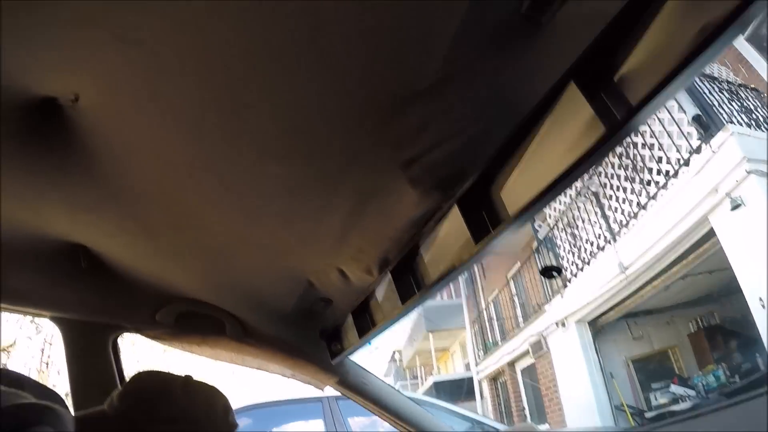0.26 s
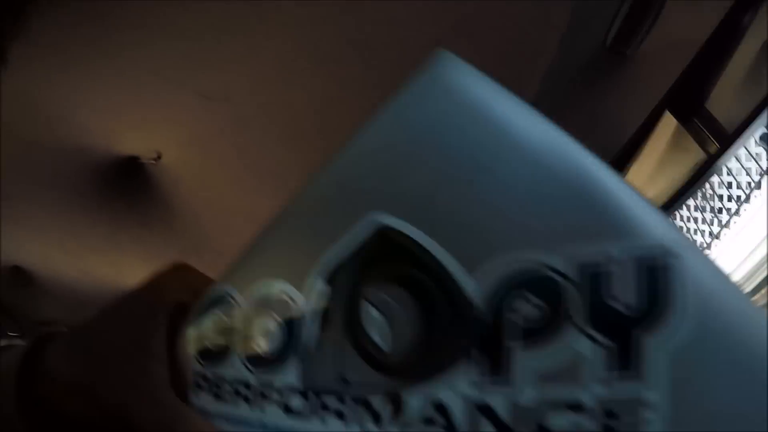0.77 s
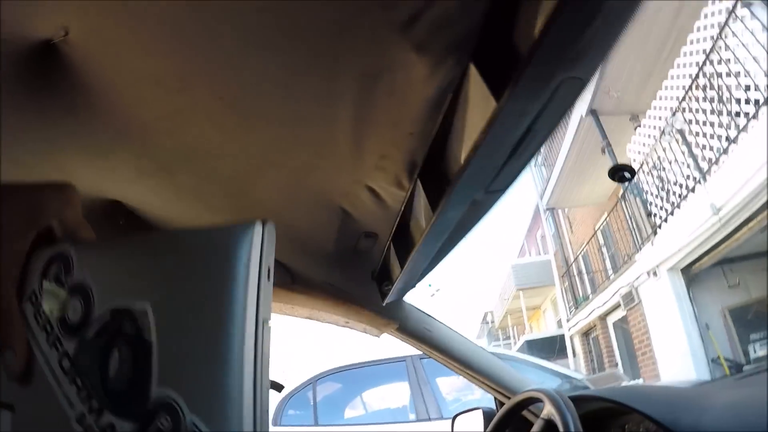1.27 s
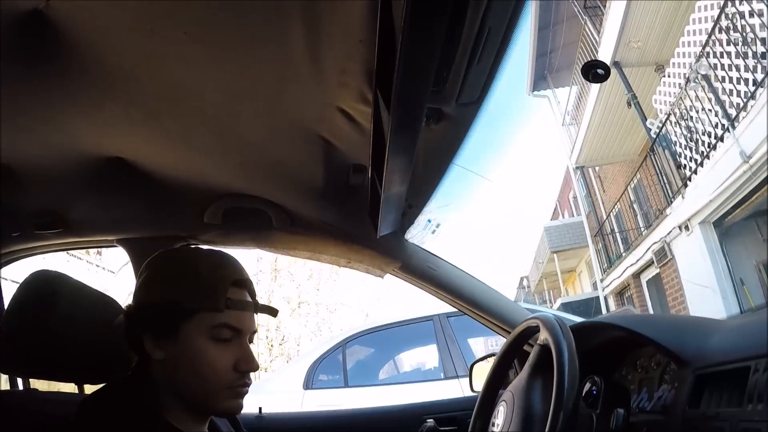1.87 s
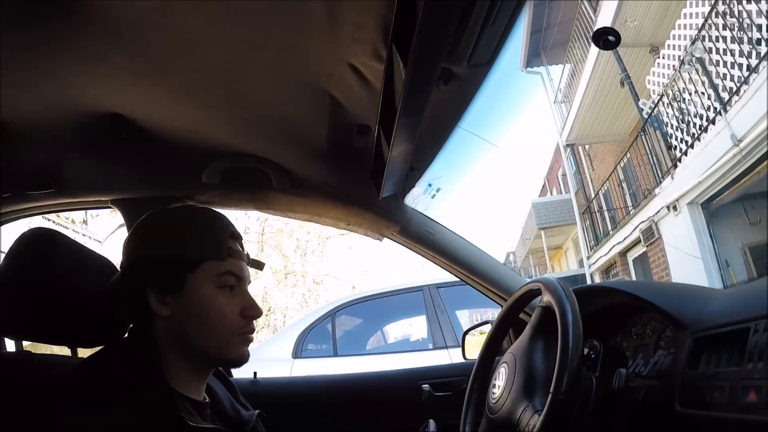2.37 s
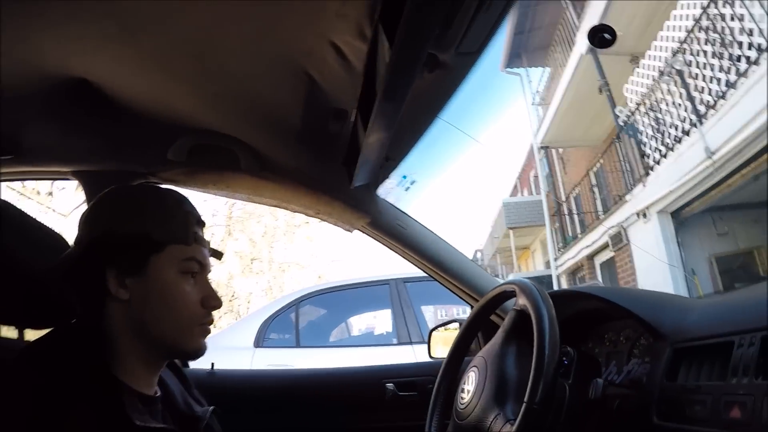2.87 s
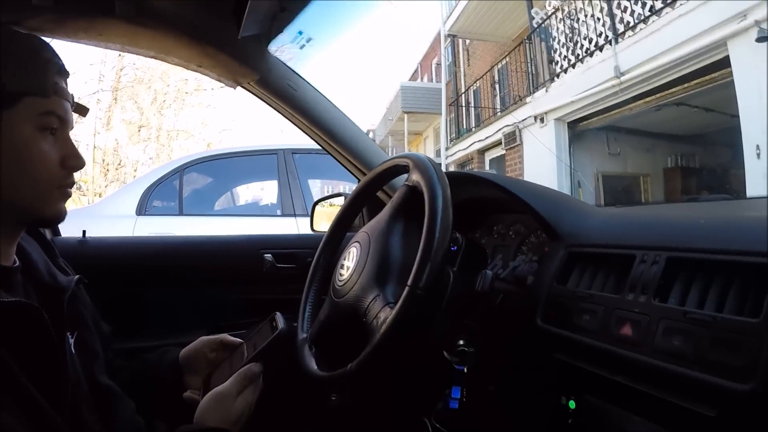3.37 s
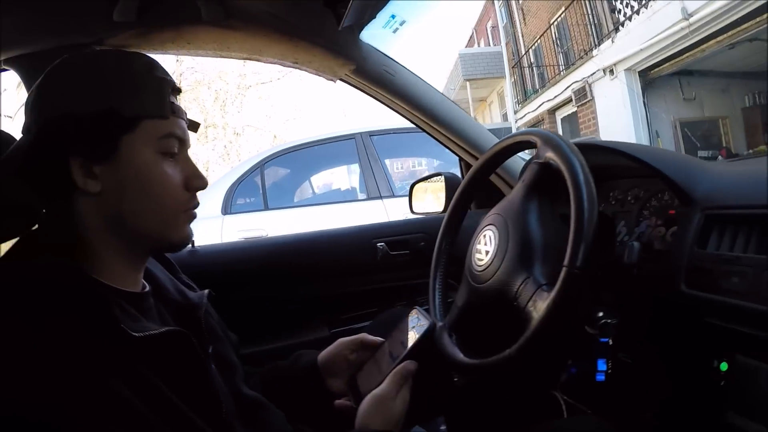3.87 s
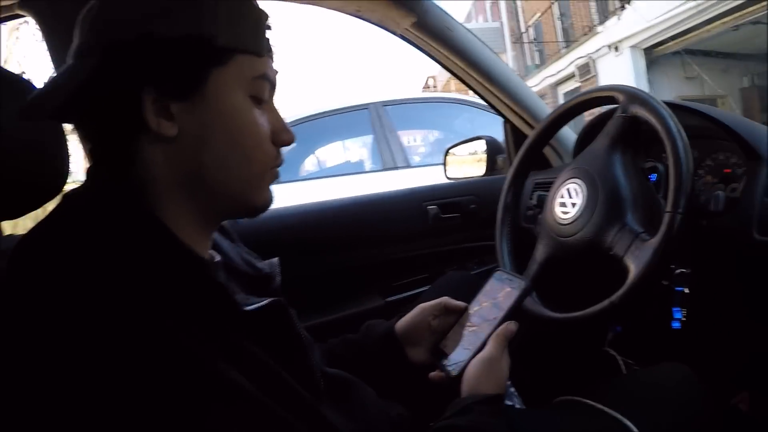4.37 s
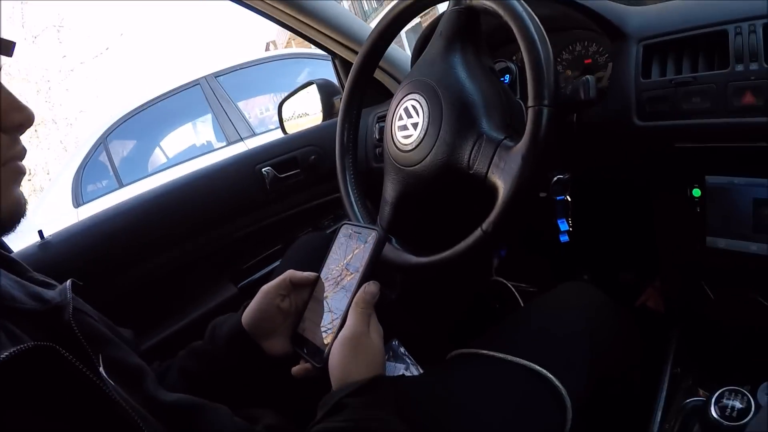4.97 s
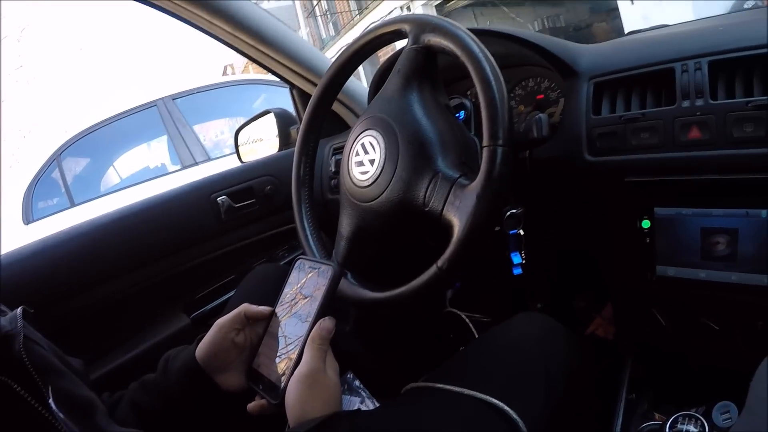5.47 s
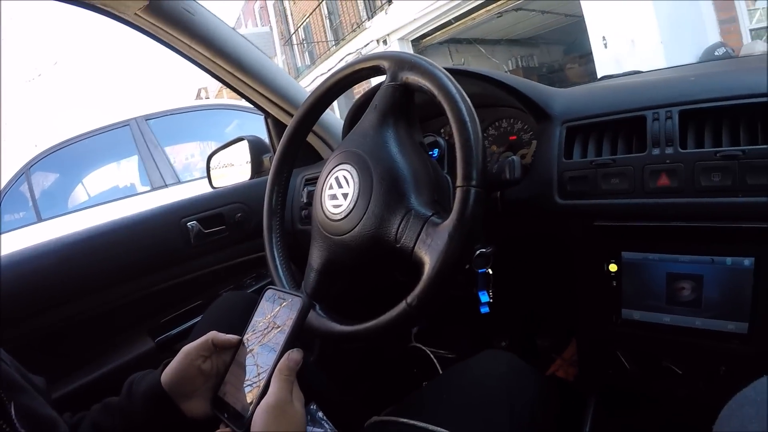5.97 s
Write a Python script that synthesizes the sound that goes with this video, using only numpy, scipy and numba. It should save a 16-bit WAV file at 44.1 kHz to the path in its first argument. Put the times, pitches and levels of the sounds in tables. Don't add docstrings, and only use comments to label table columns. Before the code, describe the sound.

Inside a parked car, a four-cylinder turbo engine idles with a deep, uneven throb. The hand-held microphone is knocked: ticks, rubbing, then a heavy clunk at half a second that briefly ducks the sound, more thumps later. A gentle press lifts the engine speed, then full throttle swells into a loud boom with hiss, and it begins to drop.

```python
import sys
import numpy as np
from scipy import signal
from scipy.fft import rfft, irfft, next_fast_len
from scipy.io import wavfile
from scipy.ndimage import uniform_filter1d
from numba import njit

SR = 44100
rng = np.random.default_rng(int(sys.argv[2]) if len(sys.argv) > 2 else 0)


def dump_mix(stems):
    frames = np.atleast_2d(stems).T
    limited = np.clip(frames, -1, 1)
    pcm = np.round(limited * 32767).astype(np.int16)
    wavfile.write(sys.argv[1], SR, pcm)


def attenuation_scalar(level_db):
    decades = np.asarray(level_db, float) / 20
    return 10 ** decades


N = 273640
T = np.arange(N) / SR
IDLE_HZ = 25.7

# time in seconds, firing rate in Hz, pulse sharpness from 0 to 1,
# exhaust pulse level in dB.
ENGINE_STATE = [(0.0, 24.74, 0.21, -22.4), (0.45, 25.12, 0.06, -21.5), (1.2, 25.78, 0.02, -17),
                (2.14, 24.93, 0.29, -24.5), (3.09, 25.45, 0.11, -17), (3.33, 28.6, 0, -15.5),
                (3.64, 39.23, 0.86, -24), (3.85, 44.33, 0.51, -14), (4.23, 47.97, 0.82, -26),
                (4.58, 50.65, 0.5, -12), (4.82, 56.76, 0.42, -0.3), (5.0, 70.23, 0.68, -12.5),
                (5.28, 99.97, 0.57, -2), (5.4, 111.6, 0.43, 3), (5.51, 116.1, 0.25, -5.5),
                (5.62, 112.3, 0.03, 1), (5.94, 98.9, 0.25, -4), (6.2, 88.04, 0.41, -3.5)]
# centre in Hz, width in Hz, level in dB.
CREAK_MODES = [(1920, 43, -1.5), (3840, 250, 1), (5760, 380, -5.5)]


def curve(table):
    s, *columns = np.transpose(table)
    return [np.interp(T, s, c) for c in columns]


def shape_db(points, hz):
    f, db = np.transpose(points)
    return np.interp(np.log(hz + 1e-9), np.log(f), db)


def swell(s, rise, hold, fall):
    return np.interp(T, s + np.cumsum(np.abs([0, rise, hold, fall])), [0, 1, 1, 0])


def walk(rate):
    k = int(SR / rate)
    steps = np.repeat(rng.standard_normal(N // k + 1), k)
    return 1.3 * uniform_filter1d(uniform_filter1d(steps, k), k)[:N]


def noise(points, flicker_db, rate, modes=()):
    size = next_fast_len(N)
    hz = np.fft.rfftfreq(size, 1 / SR)
    inside = (hz >= points[0][0]) & (hz <= points[-1][0])
    spectrum = rfft(rng.standard_normal(size)) * attenuation_scalar(shape_db(points, hz)) * inside
    for centre, width, db in modes:
        spectrum *= 1 + (attenuation_scalar(db) - 1) / (1 + (2 * (hz - centre) / width) ** 2)
    octave = np.log2(hz / points[0][0] + 1e-9)
    out = 0
    for k in range(int(octave[inside].max()) + 2):
        share = np.sqrt(np.clip(1 - abs(octave - k), 0, 1))
        out = out + irfft(spectrum * share, size)[:N] * attenuation_scalar(flicker_db * walk(rate))
    return out / np.std(out)


@njit
def svf(x, hz, width):
    y, b, l = np.empty(len(x)), 0., 0.
    for i in range(len(x)):
        g, k = np.tan(np.pi * hz[i] / SR), width / hz[i]
        v = (b + g * (x[i] - l)) / (1 + g * (g + k))
        b, l, y[i] = 2 * v - b, l + 2 * g * v, k * v
    return y


def band(x, hz, width):
    centre = np.full(len(x), 1. * hz)
    y = svf(svf(x, centre, 1. * width), centre, 1. * width)
    return y / abs(y).max()


def add(out, s, x):
    i = int(s * SR)
    out[i:i + len(x)] += x[:N - i]


def engine():
    # start, press, hold and release in seconds, throttle from 0 to 1.
    pedal = [
        (3.14, 0.22, 0.33, 0.16, 0.28),
        (4.69, 0.34, 0.39, 0.086, 1),
    ]
    # idle level in dB, dB per octave of speed,
    # dB added at full throttle.
    bay_law = [(-40, 6, 2.5), (-49.5, 6.5, 4.5), (-62, 5, 5.5), (-27.5, 2.5, 15.5)]
    hz = curve(ENGINE_STATE)[0]
    throttle = sum(depth * swell(*foot) for *foot, depth in pedal)
    octaves = np.log2(hz / IDLE_HZ)
    growl_db, clatter_db, air_db, upper_db = (
        idle + rev * octaves + push * throttle for idle, rev, push in bay_law)
    phase = 2 * np.pi * np.cumsum(hz) / SR + 3.45
    smooth_db = 4.8 * np.log2(hz / hz.min())
    out = firing_orders(phase)
    out += minor_orders(phase, growl_db, upper_db, smooth_db)
    out += body_shake()
    return out + bay_noise(phase, growl_db, clatter_db, air_db, smooth_db)


def firing_orders(phase):
    order_lag = [0.96, 2.3, 2.5, -1.75]
    order_db = [2, 0.26, -6.5, -17.5]
    bite_db, dull_db = 20.5, -7
    hz, sharp, pulse_db = curve(ENGINE_STATE)
    tilt_db = bite_db * sharp + dull_db * np.log2(hz / IDLE_HZ)
    out = np.zeros(N)
    for k, base_db in enumerate(order_db):
        db = pulse_db + base_db + k * tilt_db + boom_db((k + 1) * hz)
        out -= np.sqrt(2) * attenuation_scalar(db + 1.52 * walk(21)) * np.cos((k + 1) * phase + order_lag[k])
    return out


def boom_db(hz):
    # centre in Hz, width in Hz, level in dB.
    boom_modes = [(29.05, 11.45, 5), (38.3, 2, 1.5), (48, 1.31, 3), (75.6, 12.2, 1.3), (89.8, 8, -10),
                  (104.3, 2.9, -19.5), (131.7, 8.6, -14.5), (189, 26, -16), (199.6, 9.7, -6.5),
                  (236, 46, -10.5), (279.6, 45.5, -10.5), (383, 39.6, -0.8)]
    response = sum(attenuation_scalar(db) / (1 + 2j * (hz - f) / width) for f, width, db in boom_modes)
    return 20 * np.log10(abs(response))


def minor_orders(phase, growl_db, upper_db, smooth_db):
    # frequency in Hz, gain in dB.
    cabin = [(5, 8.5), (14, -1.5), (35, 17), (70, 11.5), (110, -1), (140, 4.5), (172, -0.5), (195, -2.5),
             (225, -8), (260, -9.5), (320, -7.5), (400, -21.5), (600, -29), (1300, -50)]
    half_db, quarter_db, fall_db = -3.5, -12.5, -0.5
    mode_share = 0.46
    hz = curve(ENGINE_STATE)[0]
    out = np.zeros(N)
    for quarter in range(1, 49):
        main_order = quarter in (4, 8, 12, 16)
        if main_order or (quarter > 16 and quarter % 2):
            continue
        k = quarter / 4
        if quarter % 4 == 0:
            kind_db = upper_db + mode_share * boom_db(k * hz)
        else:
            kind_db = growl_db + (quarter_db if quarter % 2 else half_db)
        cabin_db = np.repeat(shape_db(cabin, k * hz[::64]), 64)[:N]
        db = cabin_db + kind_db + fall_db * k
        if k < 1:
            db = db - 4.7 * smooth_db
        wander = 2 * np.pi * rng.random() + 0.78 * walk(5.5)
        out += attenuation_scalar(db + 4.24 * walk(5)) * np.cos(k * phase + wander)
    return out


def body_shake():
    shake = swell(5.42, .15, .3, .2) ** 2
    return shake * attenuation_scalar(-18 + 1.5 * walk(8)) * np.sin(2 * np.pi * 28.4 * T)


def bay_noise(phase, growl_db, clatter_db, air_db, smooth_db):
    # frequency in Hz, density in dB per Hz.
    rumble = [(12, -6), (40, 1), (90, -9), (150, -7), (230, -5), (300, -8), (450, -26.5), (700, -31)]
    clatter = [(210, -32.5), (350, 6.5), (402, -1.5), (441, -5), (521, -6.5), (627, -15), (682, -10.5),
               (776, -13), (1050, -17), (1140, -16), (1380, -21.5), (1500, -18), (3200, -33), (4160, -64.5),
               (7040, -120)]
    air = [(1530, -40), (2600, -3.5), (2730, -7.5), (3380, -1), (4200, 2), (5190, -5), (5760, -5),
           (6500, -8.5), (7320, -20.5), (8000, -20), (10400, -43.5), (17600, -120)]
    # centre in Hz, width in Hz, dB above the clatter.
    panels = [(550, 9.2, -3), (880, 66, 3.5), (1055, 8.9, 11.5), (1336, 140, 6), (1727, 21, 8.5),
              (2210, 240, 4.5), (2384, 31, 7), (2700, 45, 2.5)]
    clatter_throb = 1 + 0.17 * np.cos(phase + 5.1)
    air_throb = 1 + 0.14 * np.cos(phase + 2.8)
    clatter_gain = attenuation_scalar(clatter_db + 2.5) * clatter_throb + rubbing(column=3)
    out = attenuation_scalar(growl_db + 5.5 - 0.13 * smooth_db) * noise(rumble, 0.89, 4.6)
    out += clatter_gain * noise(clatter, 1.1, 18, panels)
    return out + attenuation_scalar(air_db + 0.56) * air_throb * noise(air, 2.2, 16, [(4050, 280, 1.7)])


def turbo():
    # start in seconds, length in seconds, centre in Hz,
    # width in Hz, level in dB.
    leaks = [
        (3.388, .75, 1300, 258, -60.5),
        (4.049, .7, 6000, 1520, -65),
        (4.994, 0.39, 4050, 799.3, -47.5),
        (5.883, 0.62, 6150, 1490, -56),
    ]
    hz = curve(ENGINE_STATE)[0]
    centre = 430 * (hz / IDLE_HZ) ** 2.0
    ring = sum(1.9 / (1 + ((centre - f) / width) ** 2) for f, width, _ in CREAK_MODES[1:])
    awake = np.clip((hz - 64) / 12, 0, 1)
    lift = 1 - swell(5.42, .05, .13, .08)
    bands = [(centre, 1600., awake * (1 + ring) * attenuation_scalar(-61.5) * lift)]
    for s, length, f, width, db in leaks:
        gain = attenuation_scalar(db) * swell(s, 0.24 * length, 0.37 * length, .3 * length)
        bands.append((np.full(N, 1. * f), 1. * width, gain))
    out = 0
    for f, width, gain in bands:
        hiss = svf(svf(rng.standard_normal(N), f, width), f, width)
        steady = hiss / np.sqrt(uniform_filter1d(hiss ** 2, size=8192))
        out = out + gain * attenuation_scalar(1.7 * walk(20)) * steady
    return out


def thuds():
    # start in seconds, peak in dB,
    # pitch in Hz, decay to -60 dB in ms.
    knocks = [(.152, -28.5, 610, 63), (.388, -29.5, 830, 46.5), (.461, -2, 720, 76.5), (.464, -9, 384, 90),
              (0.475, -2, 536, 96.5), (0.494, -18.5, 630, 175), (.538, -16, 476, 255),
              (.556, -23.5, 654, 152), (1.28, -26, 340, 122), (1.562, -30, 390, 125), (1.605, -9, 417, 69),
              (1.62, -10.5, 400.2, 70), (1.734, -22.5, 560, 73), (1.786, -19, 344, 84),
              (1.804, -25, 550, 70), (2.472, -27, 450, 46), (2.536, -19.5, 343, 58),
              (2.897, -24.5, 1180, 59), (2.895, -20, 620, 96), (3.21, -32.5, 816, 104),
              (3.326, -24.5, 506, 133), (4.473, -32, 500, 70), (4.511, -43, 550, 52),
              (4.636, -24.5, 574, 43), (5.502, -12, 65, 697.5)]
    out, t = np.zeros(N), T[:16384]
    for s, db, hz, ms in knocks:
        attack_ms = 0.022 * ms
        decay = np.exp(-np.log(1000) * 1000 * t / max(ms, 20))
        attack = np.minimum(1000 * t / max(attack_ms, .2), 1)
        burst = rng.standard_normal(len(t)) * decay * attack
        burst[int(attack_ms * SR / 1000)] += 14
        add(out, s, attenuation_scalar(db) * band(band(burst, hz, 0.86 * hz), hz, 1.4 * hz))
    return out


def bumps():
    # start in seconds, peak in dB, pitch in Hz, decay to -60 dB in seconds (at least 0.03).
    pushes = [(0.461, -2, 161.2, 0.25), (.465, -8, 221, 0.53), (.468, -12.5, 321, 0.45),
              (0.482, -1.5, 167, 0.15), (1.557, -7.5, 44.5, 0.5), (1.604, -1, 78.8, -0.21),
              (2.893, 0, 60.6, -0.36), (2.897, -19.5, 146, 0.3), (4.271, -24, 159, 1.2)]
    out, t = np.zeros(N), T[:16384]
    for s, db, hz, t60 in pushes:
        decay = np.exp(-np.log(1000) * t / max(t60, .03))
        add(out, s, -attenuation_scalar(db) * np.sin(2 * np.pi * hz * t) * decay)
    return out


def ticks():
    # start in seconds,
    # peak in dB, upper modes in dB, scrape length in ms.
    bright = [(0.1351, -37, -4, 3.3), (.388, -39.5, -9, 1.4), (0.4759, -37.5, -7.5, 2.6),
              (0.4797, -38.5, -6.5, 2.5), (1.073, -47.5, -23.5, 0.71), (1.2203, -50.5, -6, 5.6),
              (1.2655, -38, -5, 1.3), (1.3965, -36.5, -18.5, 2.7), (1.5633, -30.5, -10.5, 1.5),
              (1.63, -46.5, -9, 3.6), (1.6632, -45, -6.5, 2), (1.697, -51, -2.5, 14),
              (2.1249, -48, -0.5, 4.5), (2.5173, -45.5, -.4, 3.9), (2.8003, -49, -34, 2.8),
              (2.8944, -34, -4.5, 7.5), (2.8973, -46, 5, 0.99), (3.147, -54.5, -0.5, 1.4),
              (3.4095, -46, -9, 1.7), (3.8702, -42, -11, 2.5), (4.2366, -45, -23, 2.9),
              (4.4762, -51, -6, 2.1), (4.6783, -39.5, -20, 2.3), (4.7249, -50.5, -14, 2.9),
              (4.891, -47, -5, 1.9)]
    dull = [(0.0775, -48, -25, 1.8), (0.116, -52, -15, 3.8), (0.1531, -26, -18, 2.9),
            (.2758, -47.5, -19, 2.5), (0.2996, -41, -24, 6.4), (.4385, -33, -13, 5.9),
            (.455, -35, -21, 2.4), (0.4584, -19.5, -14.5, 5), (0.4637, -19, -28, 2.5),
            (1.2807, -41, -20, 2.7), (1.3485, -47, -4, 2.1), (1.3912, -36.5, -20, 2.2),
            (1.4203, -27, 1, 1.2), (1.4281, -39, 4.5, 3.5), (1.5456, -32, -11.5, 4.2),
            (1.555, -26.5, -8.5, 5.8), (1.5744, -34, -25, 3.3), (1.6072, -40, -19, 1.9),
            (2.9064, -35.5, -5, 2.2), (3.3234, -48, -30, 8.3), (3.336, -45.5, -6.5, 5.1),
            (3.9543, -58, -21, 3), (4.068, -35.5, -3, 3.7), (4.3615, -41, -18, 3), (4.4504, -47, -16, 2.5),
            (4.7726, -28.5, -7.5, 0.98), (4.8285, -34, -10, 1.9), (5.3762, -37.5, -28.5, 2.5)]
    # centre in Hz, width in Hz, level in dB.
    housing = [(1740, 710, 2.4), (1190, 1000, 0), (3873, 950, 5), (5530, 1300, 6), (7140, 2000, -11.5),
               (11800, 4400, -11.5)]
    out, t = np.zeros(N), T[:4096]
    rows = [(*r, 5) for r in bright] + [(*r, -7) for r in dull]
    for s, db, top_db, ms, mid_db in rows:
        grit = rng.standard_normal(len(t))
        scrape = grit * np.exp(-1000 * t / max(ms, .3)) * np.minimum(t / 0.00009, 1)
        bend = 1 + .012 * grit[-1]
        balance_db = (0, 0, mid_db, top_db, top_db, top_db)
        for (hz, width, mode_db), own_db in zip(housing, balance_db):
            add(out, s, attenuation_scalar(db + mode_db + own_db + 2.5) * band(scrape, hz * bend, width))
    return out


def creaks():
    # start in seconds, length in seconds, pitch in Hz, level in dB.
    squeaks = [
        (0.747, .13, 3105, -61),
        (3.875, 0.05, 4900, -55),
    ]
    out = 0
    for hz, width, db in CREAK_MODES:
        slips = (rng.random(N) < 180 / SR) * attenuation_scalar(3.2 * rng.exponential(size=N))
        slips = slips * rng.choice([-1, 1], N)
        ring = band(slips, hz, width)
        out = out + attenuation_scalar(db) * ring / np.std(ring)
    out *= attenuation_scalar(-3.5) * (attenuation_scalar(-75.5) + rubbing(column=2))
    for s, length, hz, db in squeaks:
        t = T[:int(length * SR)]
        add(out, s, attenuation_scalar(db) * np.sqrt(np.sin(np.pi * t / length)) * np.sin(2 * np.pi * hz * t))
    return out


def rubbing(column):
    # start in seconds, length in seconds, creak in dB, rustle in dB.
    rubs = [(0, 0.31, -58, -56), (0.264, 0.13, -54, -46.5), (.5, 0.15, -51, -45), (1.168, 0.2, -51, -43),
            (1.337, 0.16, -40, -46), (1.423, 0.15, -49, -51), (1.52, 0.11, -45, -30),
            (1.595, 0.29, -65, -65), (2.452, 0.27, -64, -59), (2.867, 0.21, -58, -50),
            (3.077, 0.21, -56, -50)]
    out = 0
    for rub in rubs:
        s, length = rub[0], rub[1]
        pressure = swell(s, 0.42 * length, 0.053 * length, .45 * length) ** 2
        out = out + attenuation_scalar(rub[column]) * pressure
    return out


def scene():
    return (engine() + turbo() + thuds() + bumps() + ticks() + creaks())[None]


def top_cut(x):
    return signal.sosfilt(signal.butter(12, 15760, fs=SR, output="sos"), x)


def record(dry):
    # frequency in Hz, density in dB per Hz.
    hiss_shape = [(3820, -34.5), (6500, -6), (7360, -8), (8460, -0.5), (10400, -5), (11800, -10),
                  (13900, -9.5), (14800, -17), (15600, -33)]
    duck_db = -6.5 * swell(.492, .025, .32, 0.19)
    hiss_db = -64 + 0.53 * duck_db
    x = dry * attenuation_scalar(duck_db) + attenuation_scalar(hiss_db) * noise(hiss_shape, .6, 10)
    return top_cut(np.tanh(0.53 * x) / 0.7)


dry = scene()
out = record(dry)
dump_mix(out)
```